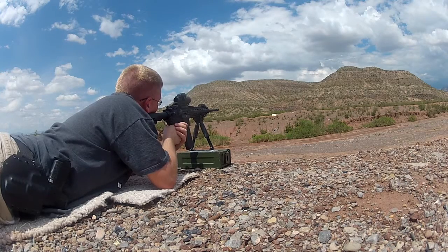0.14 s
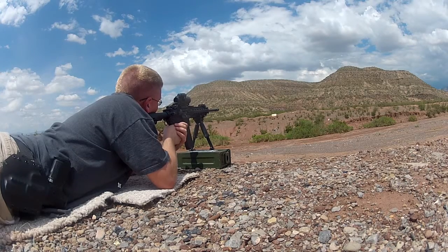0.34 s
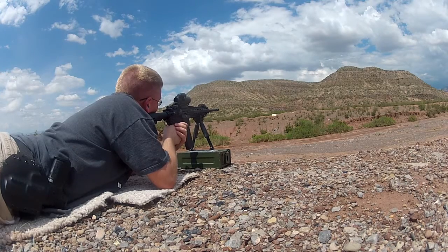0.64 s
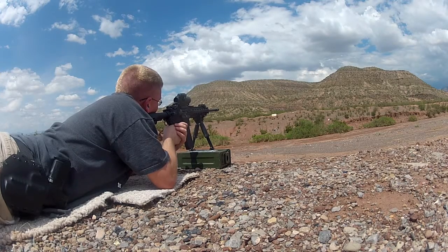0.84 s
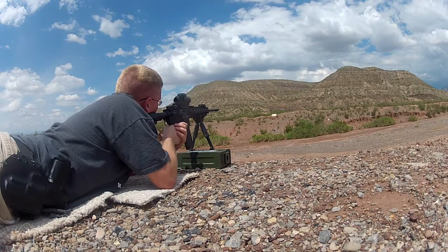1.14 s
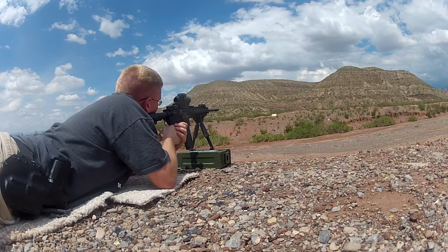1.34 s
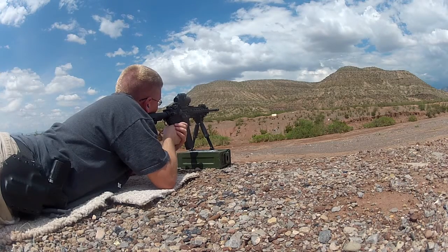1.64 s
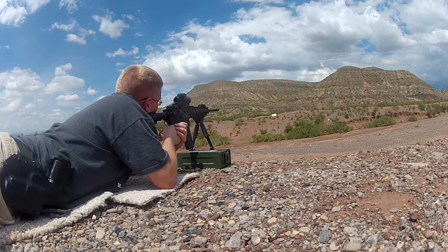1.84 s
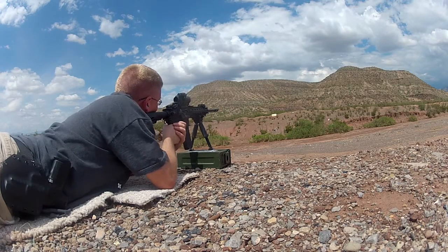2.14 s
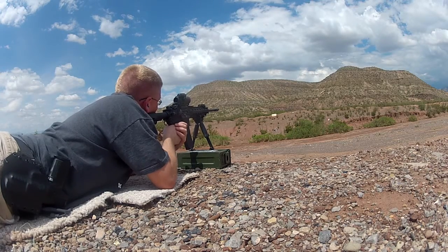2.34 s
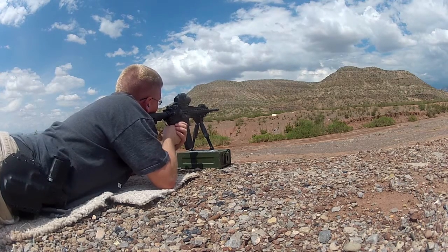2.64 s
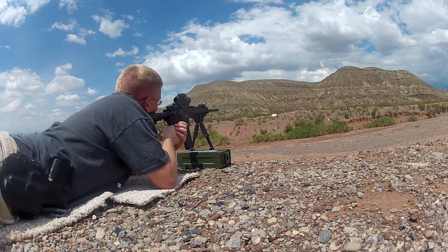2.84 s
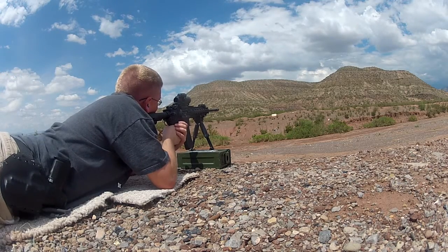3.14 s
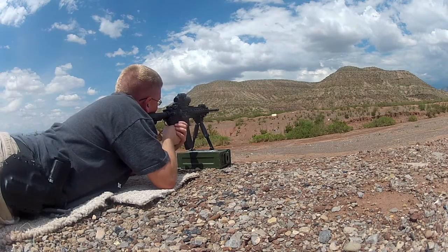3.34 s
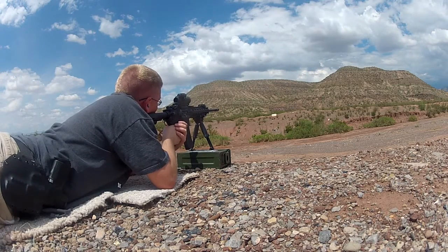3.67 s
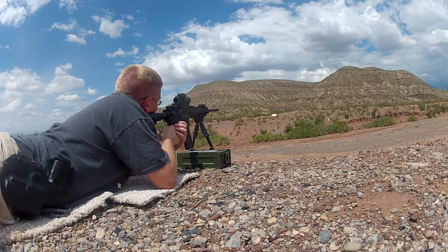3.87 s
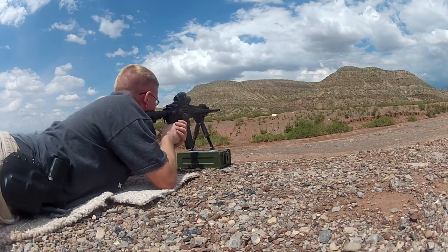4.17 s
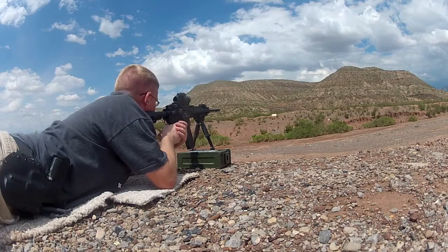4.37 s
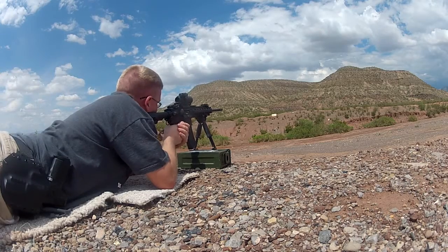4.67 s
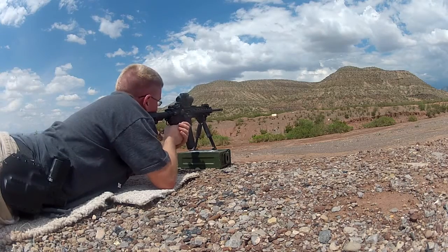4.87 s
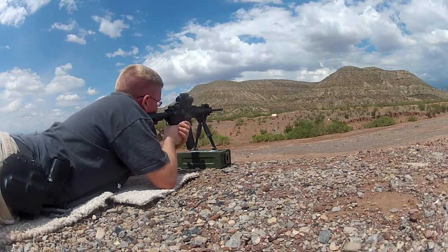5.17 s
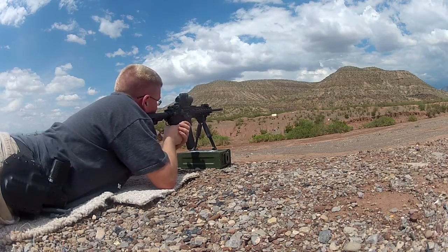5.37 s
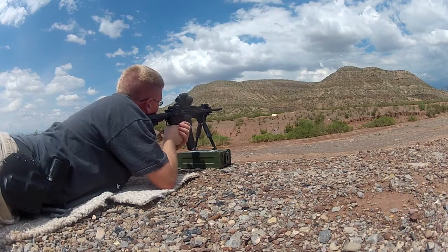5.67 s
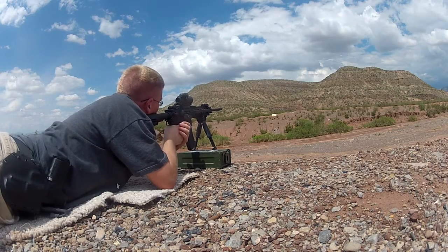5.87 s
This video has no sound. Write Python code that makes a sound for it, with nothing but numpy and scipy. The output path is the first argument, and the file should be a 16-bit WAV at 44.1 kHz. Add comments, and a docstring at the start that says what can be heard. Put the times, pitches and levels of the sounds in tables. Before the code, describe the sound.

A single rifle shot cracks very loud and close on open gravel ground, then its echo rolls away across distant hills for several seconds.

```python
"""One rifle shot from a prone shooter on a gravel range, heard from just behind him.
A short burst of noisy gas and two pressure pulses make the muzzle blast, which clips flat; steel knocks are the action.
Scattered noise, thumps and ticks roll the report back for seconds from gravel, banks, brush and far hills.
At the start the last echoes of an earlier shot are still dying away over faint wind and microphone hiss."""
import sys
import numpy as np
from scipy import signal
from scipy.fft import rfft, irfft, next_fast_len
from scipy.io import wavfile
from scipy.ndimage import uniform_filter1d

SR = 44100
rng = np.random.default_rng(int(sys.argv[2]) if len(sys.argv) > 2 else 0)


def log_audio(samples):
    """Write samples as a 16-bit WAV file to the path given in sys.argv[1]."""
    # one column per channel
    frames = np.atleast_2d(samples).T
    # limit to full scale, then quantise
    limited = np.clip(frames, -1, 1)
    pcm = np.round(limited * 32767).astype(np.int16)
    wavfile.write(sys.argv[1], SR, pcm)


N = 265041

SHOT_S = 2.1823
EARLIER_BY_S = 4.57  # time between the earlier shot and this one

# how alike left and right are in the echoes and the action: (frequency [Hz], likeness [-1 to 1])
ECHO_LIKENESS = [(60, 0.32), (300, 0.96), (1500, 0.96), (2800, 0.97), (5000, 0.78), (9000, 0.62)]


def amp(db):
    """Decibels to gain."""
    return 10 ** (np.asarray(db) / 20)


def evened(x):
    """Scales to an rms of one."""
    return x / np.sqrt(np.mean(x ** 2) + 1e-20)


def read(points, hz):
    """Reads a spectrum table on a log-frequency axis."""
    f, value = np.transpose(points)
    return np.interp(np.log(hz + 1), np.log(f + 1), value)


def tint(x, gain):
    """Filters by a function that gives the gain at each frequency."""
    size = next_fast_len(N + SR // 2)
    spectrum = rfft(x, size) * gain(np.fft.rfftfreq(size, 1 / SR))
    return irfft(spectrum, size)[..., :N]


def low_cut(x, hz):
    """Takes out the bass below a corner frequency."""
    return signal.lfilter(*signal.butter(2, hz, "high", fs=SR), x)


def pair(x, likeness):
    """Blends two unrelated signals into a partly alike left and right."""
    alike = lambda hz: np.clip(read(likeness, hz), -1, 1)
    mid = tint(x[0], lambda hz: np.sqrt((1 + alike(hz)) / 2))
    side = tint(x[1], lambda hz: np.sqrt((1 - alike(hz)) / 2))
    return np.array([mid + side, mid - side])


def noise(colour, likeness):
    """Steady stereo noise of a given colour, at an rms of one."""
    white = pair(rng.standard_normal((2, N)), likeness)
    return evened(tint(white, lambda hz: amp(read(colour, hz))))


def scatter(per_s, spread_db):
    """Countless small reflections of uneven size at random moments."""
    sizes = amp(spread_db * np.minimum(rng.exponential(1, (2, N)), 4))
    signs = rng.choice([-1, 1], (2, N))
    present = rng.random((2, N)) < per_s / SR
    return evened(pair(sizes * signs * present, ECHO_LIKENESS))


def rough_ground(colour):
    """Ground that scatters the blast in one colour, as an endless texture."""
    reflections = scatter(per_s=9900, spread_db=2.5)
    return evened(tint(reflections, lambda hz: amp(read(colour, hz))))


def patches(shape, size):
    """Random values smoothed over frequency and time."""
    field = uniform_filter1d(rng.standard_normal(shape), size=size[0], axis=0)
    return evened(uniform_filter1d(field, size=size[1], axis=1))


def echo(t, s, length, fade_db_per_s):
    """Gain of one echo: it swells, changes slowly while the blast sweeps the slope, then drops away."""
    # edge slopes for a path of one second; longer paths blur them by a power of the delay
    rise_db_per_s, fall_db_per_s, blur_power = 179, 200.5, 0.448
    blur = (s - SHOT_S) ** blur_power
    edges = rise_db_per_s * np.maximum(s - t, 0) + fall_db_per_s * np.maximum(t - s - length, 0)
    sweep = fade_db_per_s * np.clip(t - s, 0, length)
    return amp(-edges / blur - sweep) * (t > SHOT_S)


def knocks(rows, rise_s):
    """Envelope of knocks that start fast and die away by 60 dB in their t60."""
    t, envelope = np.arange(N) / SR, np.zeros(N)
    for s, db, t60 in rows:
        age = np.maximum(t - s, 0)
        decay = np.exp(-np.log(1000) * age / t60)
        envelope += amp(db) * decay * (1 - np.exp(-age / rise_s))
    return envelope


def bursts(rows, colour, rise_s):
    """Short noise knocks, all of one colour."""
    return knocks(rows, rise_s) * noise(colour, ECHO_LIKENESS)


def still_air():
    """Faint wind and microphone hiss: steady noise, strongest in the bass."""
    # colour of wind and hiss: (frequency [Hz], relative level [dB])
    air_colour = [(12, -34.5), (20, -4), (92, -3), (152, -5), (180, -6), (201, -13.5), (218, -6), (296, -9),
                  (322, -12), (475, -15.5), (741, -21), (1120, -24.5), (2660, -30), (4030, -31),
                  (15300, -32.5)]
    # (frequency [Hz], left-right likeness [-1 to 1])
    air_likeness = [(40, 0.52), (300, 0.73), (1400, 0.38), (3000, .25), (6000, 0.37), (13000, 0.5)]
    return amp(-58.5) * noise(air_colour, air_likeness)


def boom():
    """Broad slopes throw back the bass, and a rumble lingers along the ground after them."""
    # deep returns of broad slopes: (arrival [s], length [s], fading along it [dB/s], level [dB])
    slope_rows = [(2.308, .14, 0, -45.5), (2.52, .03, 0, -22), (2.641, .02, 0, -28.5),
                  (2.837, 0.18, 32, -51)]
    # slopes return wavelengths like their own size: (frequency [Hz], relative level [dB])
    slope_colour = [(40, -49.5), (90, -22), (135, -13), (165, 1), (190, -3.5), (220, -6), (260, -20.5),
                    (600, -70.5)]
    # lingering bass: (frequency [Hz], relative level [dB])
    rumble_colour = [(25, -20), (60, -11), (88, 2), (115, -8), (150, -8), (220, -18), (500, -58.5)]
    # the rumble swells to a peak, then dies slowly
    peak_s, peak_db, rise_db_per_s, fall_db_per_s = 2.55, -54.5, 50.5, 5
    t = np.arange(N) / SR
    power = sum((amp(db) * echo(t, s, length, fade)) ** 2 for s, length, fade, db in slope_rows)
    below_peak = np.maximum(rise_db_per_s * (peak_s - t), fall_db_per_s * (t - peak_s))
    rumble = amp(peak_db - below_peak) * (t > SHOT_S)
    return np.sqrt(power) * rough_ground(slope_colour) + rumble * rough_ground(rumble_colour)


def hillside(absorb_db=8.0, absorb_power=1.6, ripple_db=2.06, frame=1024):
    """The report returns from ever farther ground; on longer paths the air tilts its colour away from treble."""
    # stretches of hillside, near to far, each with one echo: (arrival [s], length [s],
    # fading along it [dB/s], relative levels of banks [dB], rocks [dB], brush [dB])
    hill_rows = [ (2.279, 0.094, -14, -34, -40.5, -43), (2.388, 0.045, 1, -35, -36, -30.5),
                 (2.431, .23, 65.5, -24.5, -27, -26.5), (2.519, 0.15, 72, -19.5, -26.5, -47),
                 (2.713, 0.12, 58, -35.5, -42, -51.5), (2.854, 0.56, 28, -43.5, -46, -59),
                 (2.902, 0.057, 0, -60, -52, -55), (3.195, 0.12, -6, -66, -63, -52),
                 (3.315, 0.51, 8, -56, -54, -65), (3.498, 0.15, 2, -53, -50, -62),
                 (3.87, 0.033, 0, -40, -49.5, -67), (3.98, 0.13, 24, -40.5, -50.5, -71),
                 (4.201, 0.045, 2, -40.5, -49.5, -63.5), (4.295, 0.18, 1, -42, -58, -78),
                 (4.42, .04, 0, -46, -57.5, -80), (4.60, 0.18, -5, -54, -67, -74.5),
                 (4.792, .19, -1, -48, -60, -77), (5.058, .26, 15, -45.5, -59, -78),
                 (5.373, 0.23, 26, -51, -64, -85), (6.30, .06, 0, -69.5, -73.5, -85), ]
    # each returns wavelengths like its own size: (frequency [Hz], relative level [dB])
    bank_colour = [(50, -55), (120, -22.5), (190, -6.5), (270, 0), (370, -0.5), (480, 1), (680, -2.5),
                   (830, -7.5), (1000, -11.5), (1400, -14.5), (3000, -61.5)]
    rock_colour = [(500, -29), (850, -7.5), (1050, -1.5), (1280, -1), (1600, -1.5), (2200, -3), (3000, -4),
                   (3800, -11), (6000, -21)]
    brush_colour = [(1800, -28.5), (2800, -4), (3600, -3.5), (5300, -1.5), (6300, -6), (8000, -8),
                    (10000, -16), (12500, -24), (15000, -29.5)]
    reflections = scatter(per_s=14000, spread_db=2.5)
    hz, t, z = signal.stft(reflections, SR, nperseg=frame, noverlap=frame * 3 // 4)
    power = np.zeros(z.shape[1:])
    for clock in (t, t + EARLIER_BY_S):  # both shots meet the same hills
        path_s = np.clip(clock - SHOT_S, 0, 4)
        air = amp(-absorb_db * np.outer((hz / 4000) ** absorb_power, path_s))
        returns = sum(np.outer(amp(db), echo(clock, s, length, fade)) ** 2
                      for s, length, fade, *db in hill_rows)
        for strength, colour in zip(returns, (bank_colour, rock_colour, brush_colour)):
            gain = amp(read(colour, hz)) * (hz < 2 * colour[-1][0])
            shape = (air * gain[:, None]) ** 2
            power += shape / shape.mean(0) * strength  # air changes the colour, not the overall level
    # slow random ripple makes narrow bands of the echo stronger or weaker for a while
    ripple = evened(amp(ripple_db * patches(z.shape[1:], size=(2, 30))))
    shaped = z * np.sqrt(power) * ripple
    rolling = signal.istft(shaped, nperseg=frame, noverlap=frame * 3 // 4)[1][:, :N]
    return amp(0.5) * rolling


def far_bank():
    """Slaps from the far bank behind the target: short bursts of coloured noise."""
    # (time [s], level [dB], t60 [s])
    slap_rows = [(3.2710, -44, 0.12), (3.2886, -29.5, 0.044), (3.2950, -35.5, 0.026), (3.3020, -47, 0.21),
                 (3.3230, -46, 0.048)]
    # (frequency [Hz], relative level [dB])
    slap_colour = [(120, -43), (200, -20), (636, -2), (1120, -8.5), (1650, -1.5), (2390, -7), (3130, -5),
                   (4520, -21), (5000, -4.5), (11000, -48), (14300, -81), (22000, -120)]
    return bursts(slap_rows, slap_colour, rise_s=0.00037)


def faces(blur_swings=2):
    """Steep banks send back distinct thumps, small stones sharp ticks; far ones are drawn out over more swings."""
    # single faces that return a blast whole: (time [s], level before the band filter [dB], pitch [Hz])
    face_rows = [(2.2176, -2.5, 515), (2.2317, -12.5, 350), (2.3816, -6.5, 6860), (2.4220, -15.5, 1410),
                 (2.4281, -14.5, 1810), (2.4978, -12.5, 900), (2.5164, -12, 454), (2.5315, -8.5, 280),
                 (2.5644, -14.5, 240), (2.64, -12, 298), (3.6300, -35.5, 433), (4.2235, -36, 540),
                 (5.5600, -51.5, 591.8)]
    t, thumps = np.arange(N) / SR, np.zeros(N)
    for clock in (t, t + EARLIER_BY_S):  # both shots meet the same faces
        for s, db, hz in face_rows:
            turns = np.maximum(clock - s, 0) * hz
            age = np.minimum(turns / (1 + blur_swings * (s - SHOT_S) ** 2), 20)
            swing = np.sin(2 * np.pi * turns)
            thumps -= amp(db) * swing * np.tanh(10 * age) * np.exp(.5 - 2 * age)
    # a face of limited size reflects little bass, and the air dulls the front
    return signal.lfilter(*signal.butter(2, [170, 9000], "band", fs=SR), thumps)


def gravel():
    """Patches of gravel around the shooter scatter the blast into short washes."""
    # (time [s], level [dB], t60 [s])
    gravel_rows = [(2.186, -16, 0.16), (2.219, -19.5, .13)]
    # (frequency [Hz], relative level [dB])
    gravel_colour = [(30, -30.5), (90, -13), (200, -3.5), (330, 2), (520, -3.5), (750, -2), (1000, -8.5),
                     (1300, -11.5), (2200, -15.5), (4700, -23), (9000, -28.5), (15000, -42.5)]
    return knocks(gravel_rows, rise_s=0.0014) * rough_ground(gravel_colour)


def action():
    """Hammer and bolt: short knocks of bright, steel-coloured noise."""
    # (time [s], level [dB], t60 [s])
    action_rows = [(2.1785, -21.5, .02), (2.2185, -24.5, .035), (2.2275, -31.5, .025), (2.2372, -20, .022)]
    # colour of struck steel: (frequency [Hz], relative level [dB])
    steel_colour = [(800, -19.5), (2000, -6.5), (4500, -7.5), (6700, -1), (8000, -5.5), (9500, -6),
                    (11000, -17.5), (15000, -21)]
    return bursts(action_rows, steel_colour, rise_s=.0006)


def ports(x):
    """The two microphone openings differ in level and phase, mostly in the bass."""
    # (frequency [Hz], left minus right [dB])
    balance = [(60, 7.5), (110, 5), (200, 1.5), (380, 1.15), (1300, 0.36), (4400, 0), (9000, 0)]
    # (frequency [Hz], phase by which left leads [rad])
    lead = [(30, -.2), (200, -0.53), (700, -0.01), (1600, -0.14), (3700, -.2)]
    # each side takes half of the difference
    half = lambda hz: amp(read(balance, hz) / 2) * np.exp(.5j * read(lead, hz))
    return tint(x, lambda hz: np.array([half(hz), 1 / half(hz)]))


def push(s, ms):
    """A blast wave: a shock front, a short push and a longer suction."""
    u = np.maximum(np.arange(N) / SR - s, 0) * 1000 / ms
    return 2 * (1 - u) * np.exp(-u) * (1 - np.exp(-10 * u))


def muzzle(ground_lag_s=.007):
    """The blast wave and its bounce off the ground, inside a burst of turbulent gas."""
    # colour of the gas noise: (frequency [Hz], relative level [dB])
    gas_colour = [(40, -14.5), (300, -5), (700, 9.5), (1200, -2), (2200, -5), (3500, -2.5), (5500, -4.5),
                  (7500, -1), (9000, -10.5), (15000, -18)]
    gas_likeness = [(200, .7), (1200, .75), (4000, 1.0), (9000, 0.23)]  # (frequency [Hz], likeness)
    # the gas builds up, blows briefly and collapses; the hold counts from the shot
    gas_db, rise_s, hold_s, fall_db_per_s = 8.5, 0.0021, 0.004, 4500.5
    age = np.arange(N) / SR - SHOT_S
    fall_db = fall_db_per_s * np.maximum(age - hold_s, 0)
    pressure = np.clip(age / rise_s, 0, 1) * amp(gas_db - fall_db)
    gas = noise(gas_colour, gas_likeness) * pressure
    direct = amp(0.5) * push(SHOT_S, ms=1.8)
    bounce = push(SHOT_S + ground_lag_s, ms=.5)
    return gas + low_cut(direct + bounce, hz=70.2)


def scene():
    """The still air, the echoes, the rifle's action and the shot."""
    far = boom() + hillside() + far_bank()
    near = faces() + gravel()
    return ports(still_air() + far + near + action()) + muzzle()


def record(dry, ceiling=.88):
    """The blast clips flat; the input passes no steady pressure; then the band limit."""
    clipped = low_cut(np.clip(dry, -ceiling, ceiling), hz=15)
    band_limit = signal.firwin(511, 15450, window=("kaiser", 9), fs=SR)  # low-pass edge in Hz
    return signal.oaconvolve(clipped, band_limit[None], "same")


dry = scene()
out = record(dry)
log_audio(out)
```